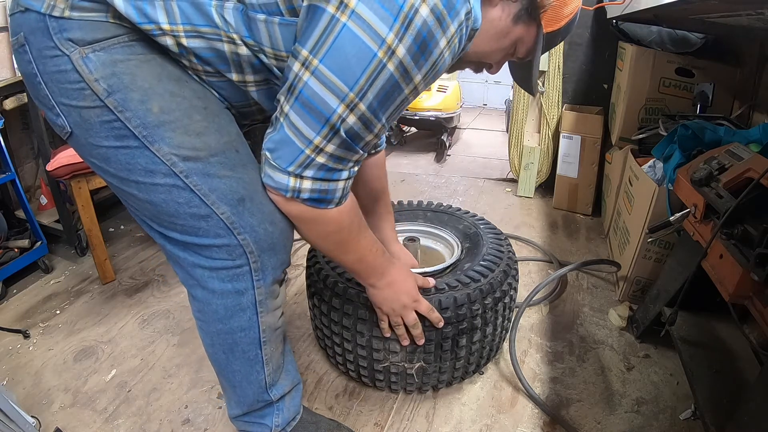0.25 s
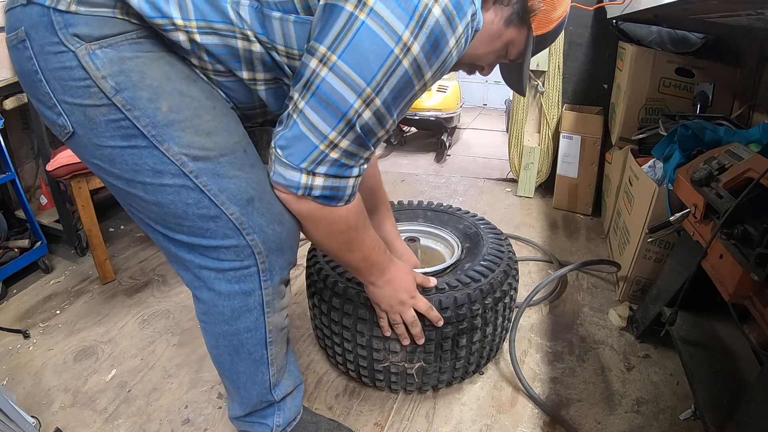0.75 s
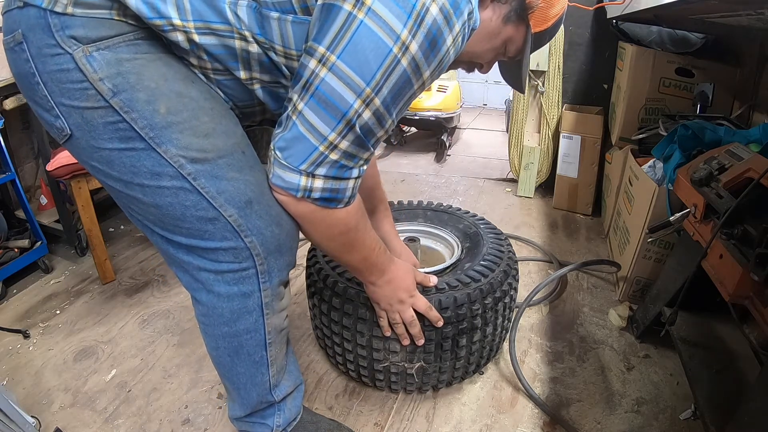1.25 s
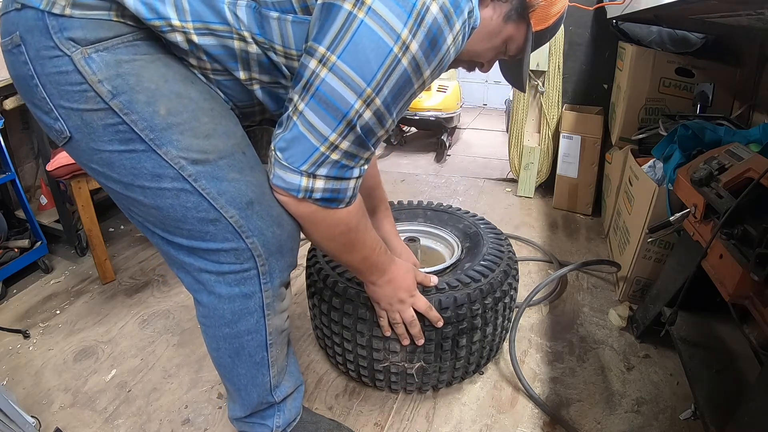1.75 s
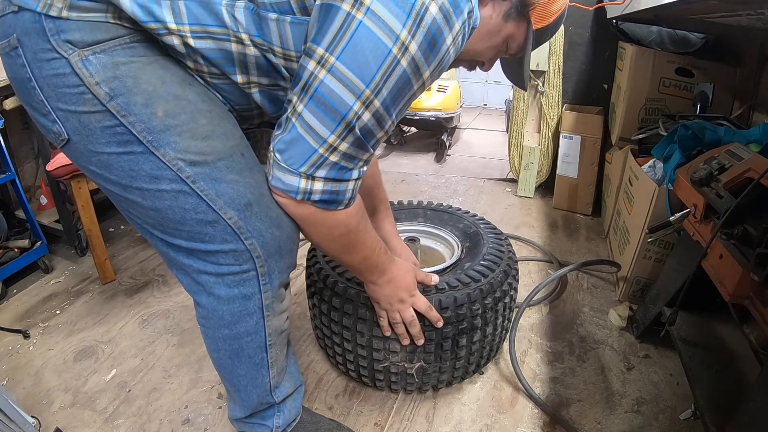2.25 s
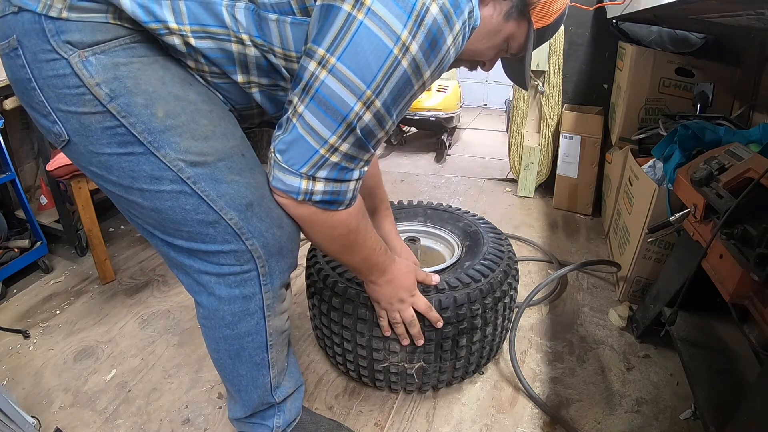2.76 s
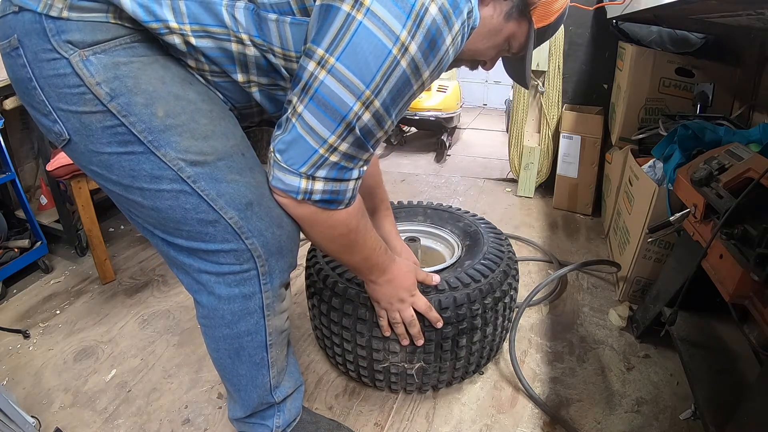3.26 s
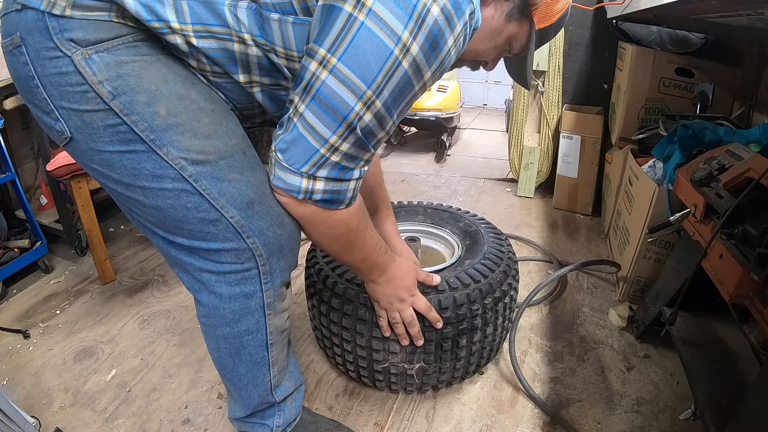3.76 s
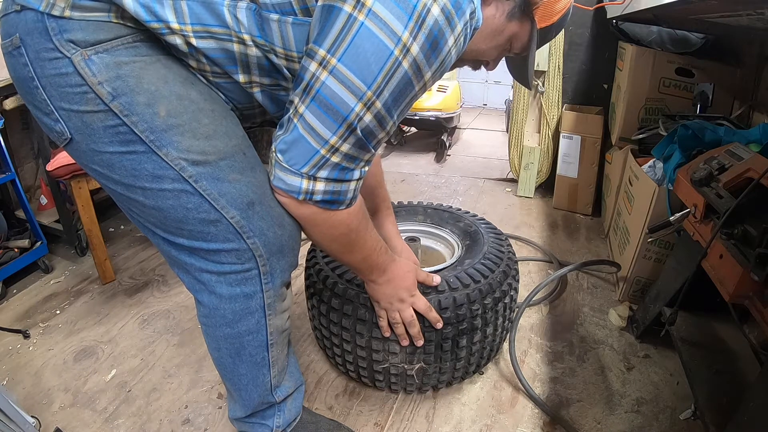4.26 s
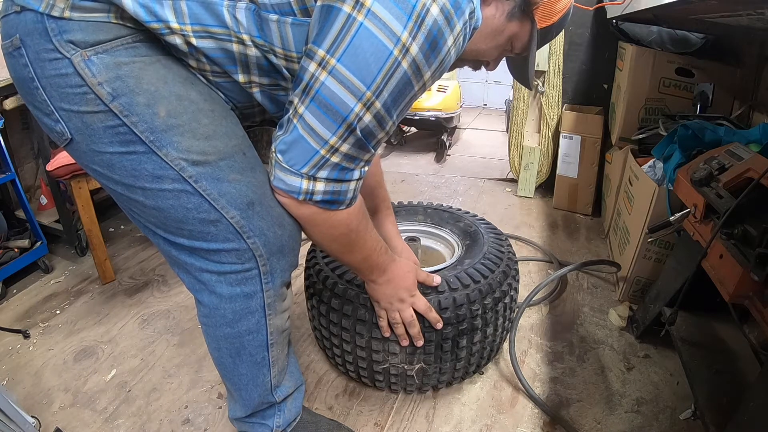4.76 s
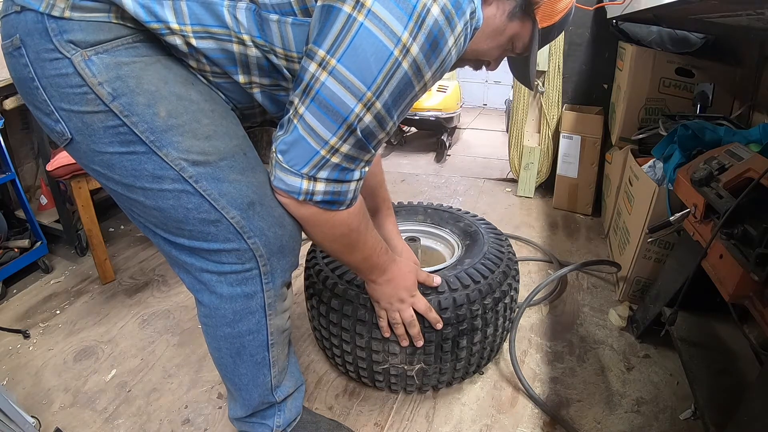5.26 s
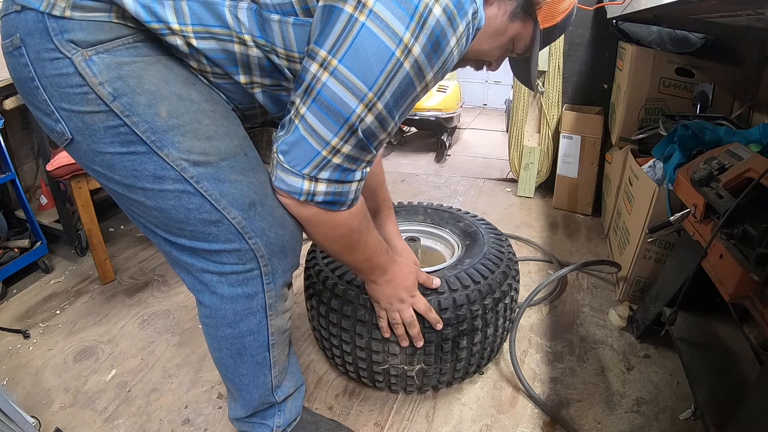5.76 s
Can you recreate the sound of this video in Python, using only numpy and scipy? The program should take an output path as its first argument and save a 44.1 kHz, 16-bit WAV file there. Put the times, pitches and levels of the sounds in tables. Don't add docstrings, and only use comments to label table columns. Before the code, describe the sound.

Constant low motor boom and rumble fill a small garage. A tire close to the microphone takes air with a high, thin, whistling hiss leaning right. At first a coarse, metallic rush leaks around the rim; it weakens in jerks and nearly disappears as the rubber seats. A muffled bump shakes the camera mid-way and a weaker one comes later, while compressor and hiss continue.

```python
import sys
import numpy as np
from scipy import signal
from scipy.fft import rfft, irfft
from scipy.io import wavfile
from scipy.ndimage import uniform_filter1d

SR = 44100
rng = np.random.default_rng(int(sys.argv[2]) if len(sys.argv) > 2 else 0)


def master_out(mix):
    frames = np.transpose(np.atleast_2d(mix))
    ceiling = np.clip(frames, -1, 1)
    pcm = np.round(ceiling * 32767).astype(np.int16)
    wavfile.write(sys.argv[1], SR, pcm)


def boost_factor(decibels):
    exponent = np.asarray(decibels, float) / 20
    return 10 ** exponent


N = 264996
T = np.arange(N) / SR
HZ = np.arange(N // 2 + 1) * SR / N

# start_s, stroke_rate_hz
PUMP_SPEED = [(0, 31.572), (.52, 31.47), (1.05, 31.526), (1.55, 31.48), (2.2, 31.472), (2.6, 31.53),
              (3.4, 31.574), (4.45, 31.572), (4.85, 31.462), (5.3, 31.5), (6.01, 31.538)]
# multiple_of_stroke_rate, left_level_db, right_level_db
STROKE_BOOM = [(1, -29.8, -30.8), (2, -36.8, -32.2), (3, -42.7, -52.8), (4, -58.4, -43.3),
               (5, -30.6, -31.5), (6, -48.2, -49.0), (7, -44.3, -44.3), (8, -38.2, -37.1),
               (9, -47.3, -46.3), (10, -62.0, -56.3), (11, -65.2, -59.6), (12, -56.6, -52.1),
               (13, -65.7, -58.3), (14, -75.7, -68.9), (15, -66.5, -64.5), (16, -67.7, -58.9),
               (17, -67.0, -66.4), (18, -70.7, -61.6), (19, -58.4, -58.5), (20, -69.5, -67.5),
               (21, -56.9, -55.3), (22, -64.3, -60.9)]
# pitch_hz, level_db_per_hz
MOTOR_RUMBLE = [(6, -97), (18, -55), (40, -60), (75, -54), (115, -74.5), (170, -65), (320, -68.5),
                (560, -71), (850, -76.5), (1300, -84), (2500, -90.5), (4000, -94), (8000, -108),
                (16000, -125)]
# pitch_hz, width_hz, level_db_per_hz
ROOM_MODES = [(97, 16, -59), (130, 37, -59), (214.2, 15, -57.5), (277.6, 21.3, -60), (339, 21.6, -61.5),
              (385.3, 31, -57.5), (409.2, 12.4, -56.5), (447.4, 18, -60.5), (480, 14, -63),
              (503.4, 10.7, -64.5), (545, 8.1, -64.5), (677.5, 34, -66.5), (680, 9.5, -58),
              (704.8, 15.2, -59), (736, 33, -64), (1007, 21, -81), (1370, 17, -80.5), (1520, 25, -79.5),
              (2158, 39, -81), (2390, 21, -85.5), (3940, 67, -91)]


def pump():
    phase = 2 * np.pi * np.cumsum(np.interp(T, *np.transpose(PUMP_SPEED))) / SR
    start, step, spread, curl = 1.35, 1.35, -1.34, -.03
    boom = np.zeros((2, N))
    for k, left_db, right_db in STROKE_BOOM:
        port_gain = np.sqrt(2) * boost_factor(np.array([[left_db], [right_db]]))
        boom += port_gain * np.cos(k * (phase + step) + start + (spread + curl * k) * k * k)
    rumble = air(boost_factor(along(MOTOR_RUMBLE)))
    return boom + rumble + ringing(ROOM_MODES, flicker_db=0.86, rate_hz=4.0)


# pitch_hz, level_db_per_hz
VALVE_HISS = [(2500, -105), (4000, -99), (5100, -93), (6500, -82.5), (7700, -88.5), (8200, -92.5),
              (9000, -93.5), (10500, -100), (11300, -109), (12300, -104), (13000, -108), (13900, -116),
              (14400, -113), (16000, -120)]
# pitch_hz, width_hz, level_db_per_hz, left_lean_db
STEM_WHISTLES = [(4310, 90, -89.5, 0), (4705, 90, -84, -2), (5260, 90, -90, 0), (5420, 110, -82.5, 0),
                 (6050, 80, -84, -4), (6265, 110, -78, 1), (6715, 110, -79, -2), (6900, 50, -80, -2),
                 (7305, 90, -77.5, 5), (7550, 120, -79, 2), (7760, 220, -84, 5), (8610, 150, -87, 1),
                 (9500, 120, -95, 0), (10500, 150, -100, 0), (11850, 250, -98, 0), (12100, 200, -99, 0),
                 (12660, 110, -97, -1)]


def valve():
    upside_down = -1
    hiss = air(boost_factor(along(VALVE_HISS)), lean=1.4, sign=upside_down) * boost_factor(.5 * walk(5.8))
    whistles = ringing(STEM_WHISTLES, flicker_db=1.24, rate_hz=10, lean=1.77, sign=upside_down)
    loose_db, sealed_db, creep_db_per_s = -2, 0.13, 0.45
    sealed = after(0.76, takes_s=.08)
    seal_db = loose_db + (sealed_db - loose_db + creep_db_per_s * T) * sealed
    return hiss + whistles * boost_factor(seal_db)


# start_s, flow_db
BEAD_FLOW = [(0, -0.5), (.42, 0.7), (.68, -5.5), (1.0, -3), (1.2, -3.5), (1.35, -2.8), (1.7, -2.5),
             (1.85, -6), (2.2, -8.5), (2.5, -10), (2.64, -14), (4, -16.5), (6.01, -27)]
SLIP_S, SLIP_TAKES_S = 1.21, 0.023
SEAT_TAKES_S = 0.17
DULLED_DB = -4


def leak():
    flow_db = np.interp(T, *np.transpose(BEAD_FLOW))
    slipped = after(SLIP_S, SLIP_TAKES_S)
    return (rush(slipped) + rim(flow_db, slipped)) * boost_factor(flow_db) + jet(flow_db)


# pitch_hz, level_db_per_hz
RUSH_COLOUR = [(700, -87), (1000, -80.5), (1400, -77), (1750, -80.5), (2500, -84), (3600, -86),
               (4200, -88.5), (5000, -85.5)]


def rush(slipped):
    colour = boost_factor(along(RUSH_COLOUR) - 40 * (HZ < 650) - 30 * (HZ > 5500))
    bright = np.clip(HZ / 1500 - 1.2, 0, 1)
    dark_part = air(colour * np.sqrt(1 - bright))
    bright_part = air(colour * np.sqrt(bright))
    return dark_part + bright_part * boost_factor(DULLED_DB * slipped)


# pitch_hz, width_hz, level_db_per_hz, left_lean_db
RIM_MODES = [(1010, 35, -71, 0), (1095, 25, -75, 0), (1305, 60, -67.5, 0), (1356, 30, -69, 0),
             (1400, 60, -76, 0), (1517, 20, -72, 0), (1700, 40, -77, 0), (1853, 26, -68, -2),
             (1955, 18, -73, 0), (2095, 40, -75, 0), (2200, 25, -78, 0), (2290, 25, -78, 0),
             (2530, 50, -76, 0), (2800, 70, -81, 0), (3060, 90, -82, 0), (3210, 70, -81, 0),
             (3450, 70, -83, 0), (3580, 70, -82, 0)]


def rim(flow_db, slipped):
    sharp_hz = (1517, 1853, 1955)
    sharp_modes = [mode for mode in RIM_MODES if mode[0] in sharp_hz]
    broad_modes = [mode for mode in RIM_MODES if mode[0] not in sharp_hz]

    low = ringing([mode for mode in broad_modes if mode[0] < 1800], flicker_db=1.2, rate_hz=9)
    low_db = -11 * np.exp(-T / .1) + 2 * slipped - 5 * after(2.15, SEAT_TAKES_S)

    high = ringing([mode for mode in broad_modes if mode[0] > 1800], flicker_db=1.8, rate_hz=9)
    start_db, full_db, damped_db, build_s = 1, 2.5, -4, 0.66
    built_db = full_db + (start_db - full_db) * np.exp(-T / build_s)
    high_db = built_db + (damped_db - built_db) * slipped

    sharp_db = 2 + 1.1 * flow_db + 2 * DULLED_DB * slipped
    sharp = air(resonances(sharp_modes)) * boost_factor(sharp_db + 0.81 * walk(9.3))

    freed = air(resonances([(1700, 96, -72.5)])) * slipped
    return low * boost_factor(low_db) + high * boost_factor(high_db) + sharp + freed


# pitch_hz, level_db_per_hz
JET_COLOUR = [(4600, -99), (5700, -82.5), (7800, -84), (9000, -84), (11000, -90), (13000, -95.5),
              (14500, -102), (16000, -108)]


def jet(flow_db):
    gush_db = 3 * np.exp(-T / 0.48)
    seated_db = -4 * after(2.73, SEAT_TAKES_S)
    level_db = -3 + gush_db + 0.22 * flow_db + seated_db
    treble = air(boost_factor(along(JET_COLOUR) - 30 * (HZ < 3800)), lean=0.7)
    return treble * boost_factor(level_db + 0.35 * walk(7))


# start_s, pitch_hz, level_db, decay_s, left_share_of_opposite_swing
BODY_BUMPS = [
    (2.672, 225, -31, .015, -.8),
    (2.675, 75, -23, .018, -1.),
    (2.695, 118, -16, .022, .75),
    (2.74, 125, -24, .014, .4),
    (2.76, 80, -25, .02, .4),
    (2.824, 58, -24, .022, -.9),
    (4.415, 125, -25, .018, .7),
]


def bumps():
    out = np.zeros((2, N))
    for start_s, hz, db, decay_s, left in BODY_BUMPS:
        age = np.maximum(T - start_s, 0) / decay_s
        envelope = age ** 2 * np.exp(2 - 2 * age)
        swing = np.sin(2 * np.pi * hz * (T - start_s))
        out += boost_factor(db) * envelope * swing * np.array([[-left], [1]])
    return out


def clutter(x):
    depth_db, spacing_hz = 1.3, 22.
    knots = np.arange(0, SR / 2, spacing_hz)
    shared, *own = (np.interp(HZ, knots, v) for v in rng.standard_normal((3, len(knots))))
    fade_in = np.clip(HZ / 900, 0, 1) ** 4
    ripple_db = depth_db * (shared + 1.4 * np.array(own)) * fade_in
    return irfft(rfft(x) * boost_factor(ripple_db), N)


# pitch_hz, share_0_to_1
PORTS_ALIKE = [(30, .98), (70, .9), (115, .45), (200, .9), (350, .7), (700, .9), (1500, .85), (3000, .68),
               (5000, .3), (7300, .55), (9000, .3), (11000, .1), (13000, .12), (15000, .15)]
# pitch_hz, level_db
BODY_SHADOW = [(60, 1), (130, 2.5), (200, 2), (380, -1), (1200, 0), (3500, -1.5), (4500, -6), (6200, -9),
               (7800, -6.5), (10000, -7.5), (15000, -4)]


def air(gain, lean=1, sign=1):
    shared, left, right = rfft(rng.standard_normal((3, N))) * np.sqrt(SR / 2)
    alike = np.sqrt(np.clip(along(PORTS_ALIKE), 0, 1))
    common = np.sqrt(alike) * shared
    own = np.sqrt(1 - alike)
    left_sign = np.where(HZ < 11500, sign, 1)
    left = (left_sign * common + own * left) * boost_factor(lean * along(BODY_SHADOW))
    right = common + own * right
    return irfft(gain * np.array([left, right]), N)


def ringing(modes, flicker_db, rate_hz, **place):
    return sum(air(resonances(modes[k::3]), **place) * boost_factor(flicker_db * walk(rate_hz)) for k in range(3))


def resonances(modes):
    power = 0
    for hz, width, db, *left_db in modes:
        port_gain = boost_factor(db + np.array([[sum(left_db)], [0]]))
        power = power + port_gain ** 2 / (1 + (2 * (HZ - hz) / width) ** 2) ** 2
    return np.sqrt(power)


def along(points):
    hz, value = np.transpose(points)
    return np.interp(np.log(HZ + 1), np.log(hz), value)


def walk(rate_hz):
    k = int(SR / rate_hz)
    held = np.repeat(rng.standard_normal(N // k + 1), k)
    return 1.3 * uniform_filter1d(uniform_filter1d(held, k), k)[:N]


def after(start_s, takes_s):
    return .5 + .5 * np.tanh((T - start_s) / takes_s)


def scene():
    return clutter(pump() + valve() + leak()) + bumps()


def top_cut(x):
    return signal.sosfilt(signal.butter(12, 15720, fs=SR, output="sos"), x)


# pitch_hz, lag_radians
LEFT_PORT_LAG = [(35, 0), (65, .35), (170, .5), (290, 1.), (400, 2.3), (500, 3.1), (700, 3.9), (1000, 4.2),
                 (2000, 4.9), (4000, 6.), (6000, 6.9), (9000, 8.6), (11000, 9.4), (12000, 12.6)]


def record(dry):
    left = irfft(rfft(dry[0]) * np.exp(-1j * along(LEFT_PORT_LAG)), N)
    return top_cut(np.array([left, dry[1]]))


dry = scene()
out = record(dry)
master_out(out)
```